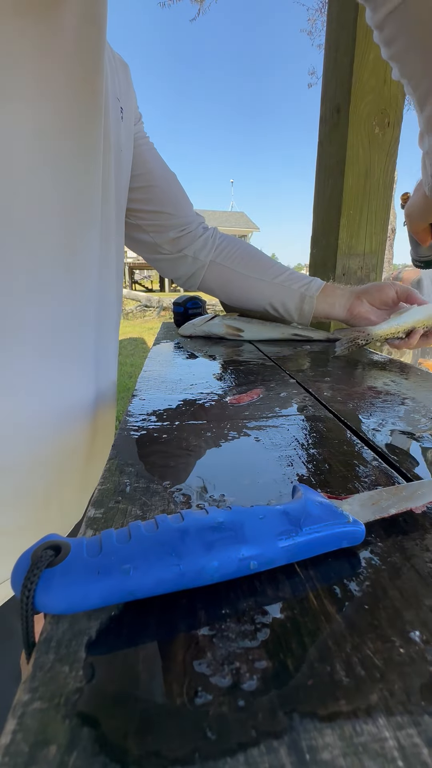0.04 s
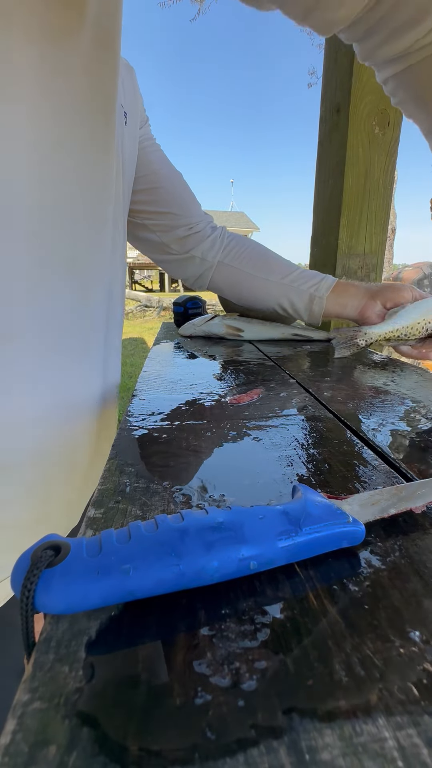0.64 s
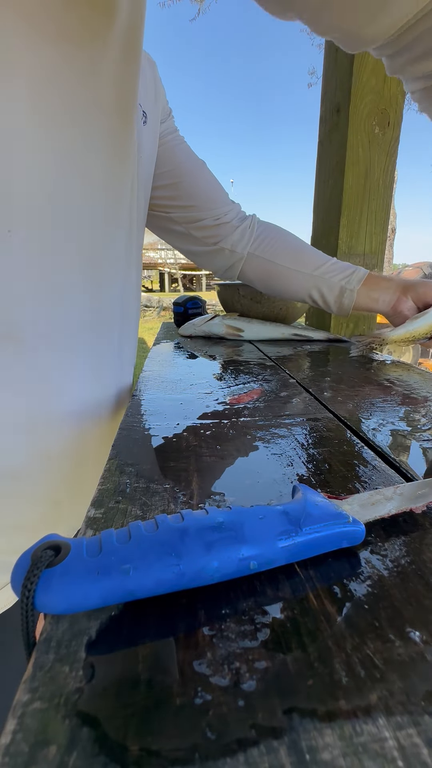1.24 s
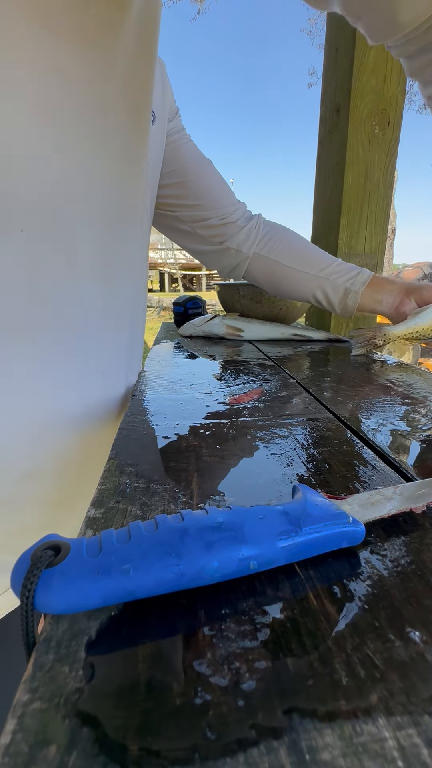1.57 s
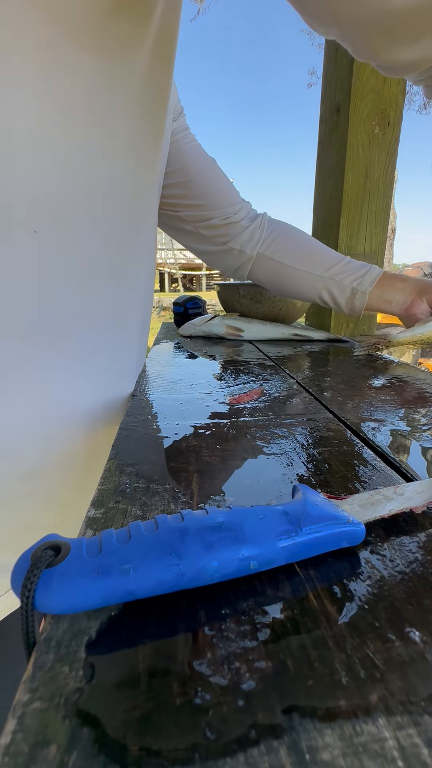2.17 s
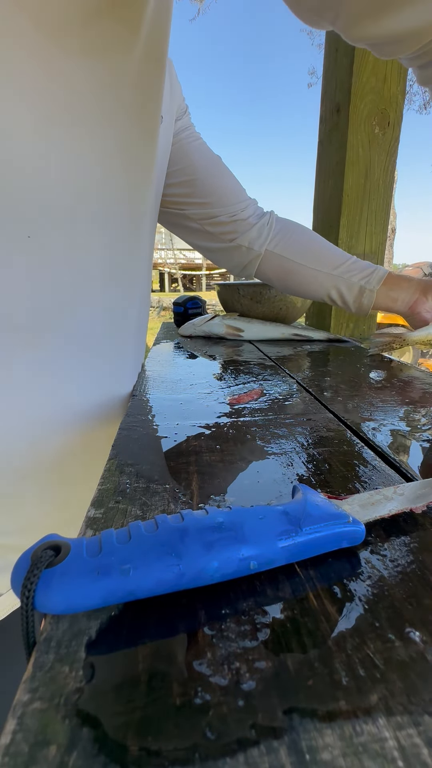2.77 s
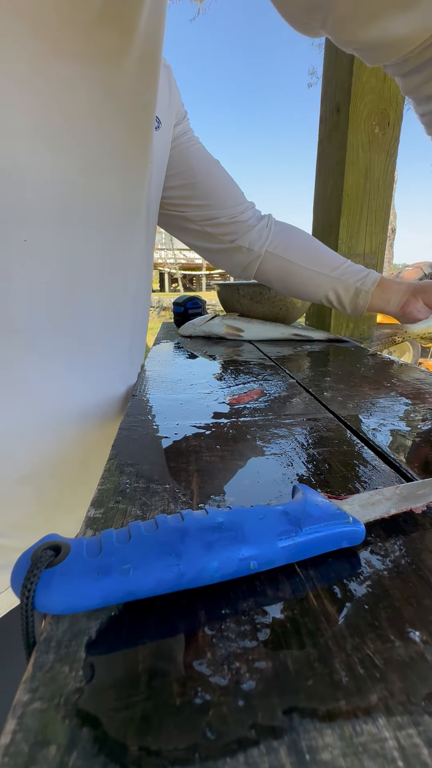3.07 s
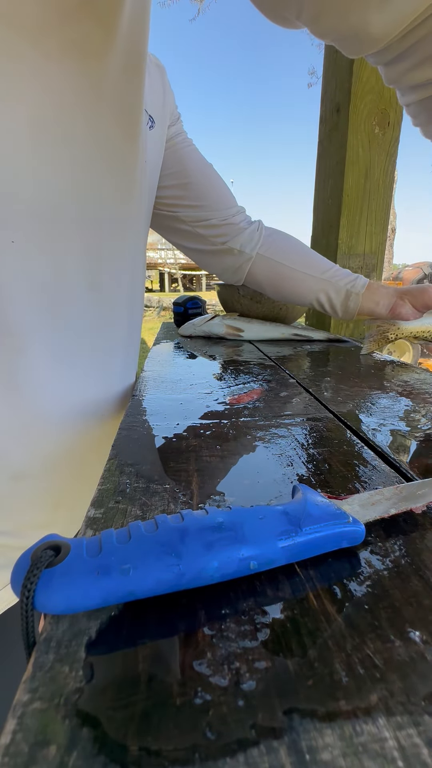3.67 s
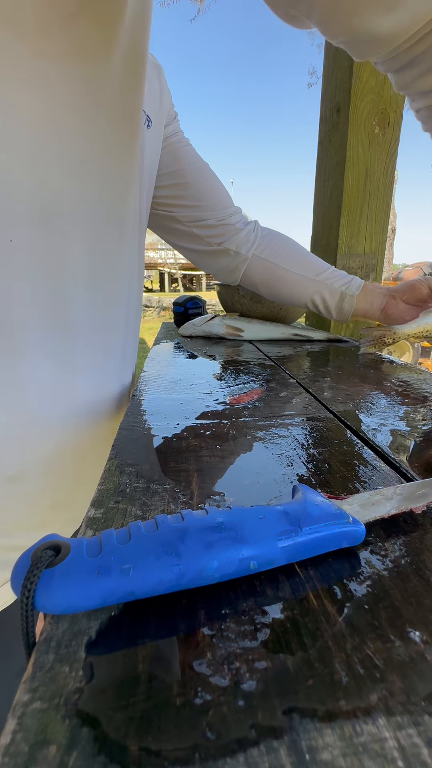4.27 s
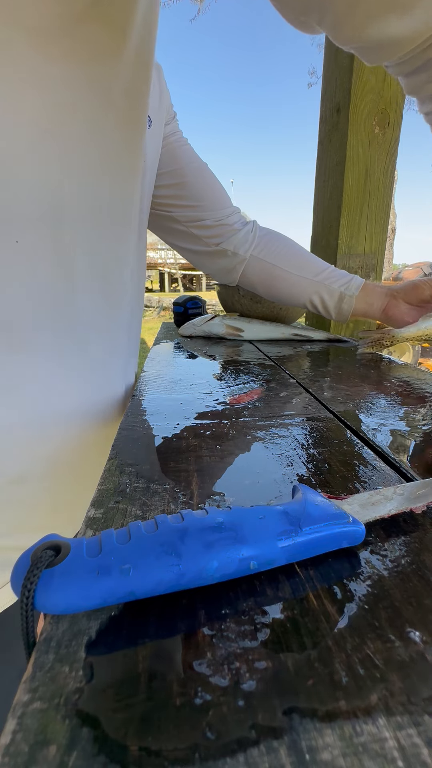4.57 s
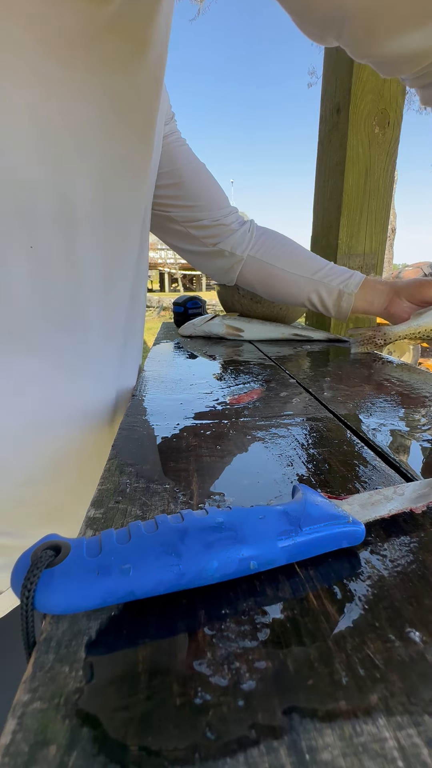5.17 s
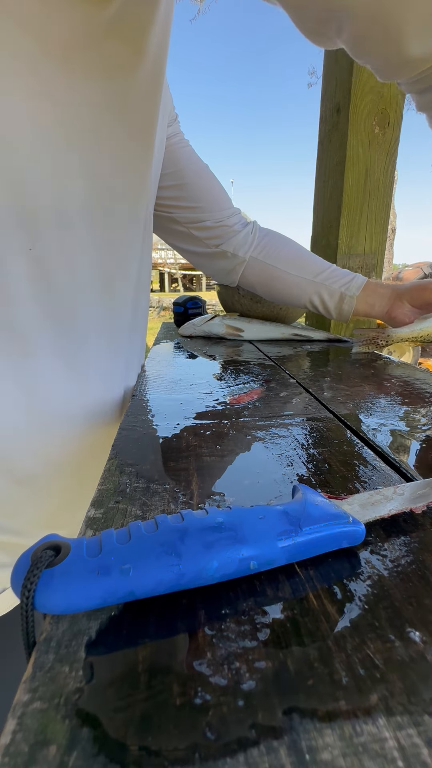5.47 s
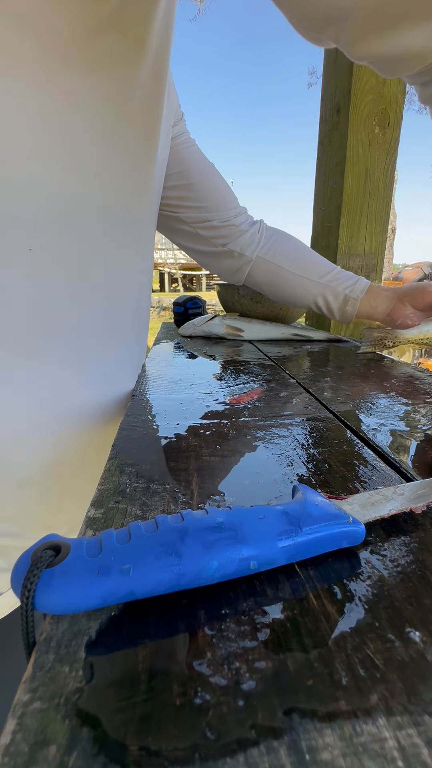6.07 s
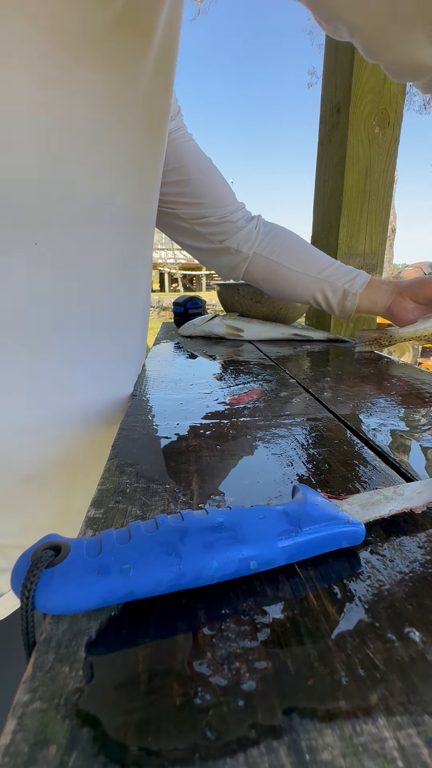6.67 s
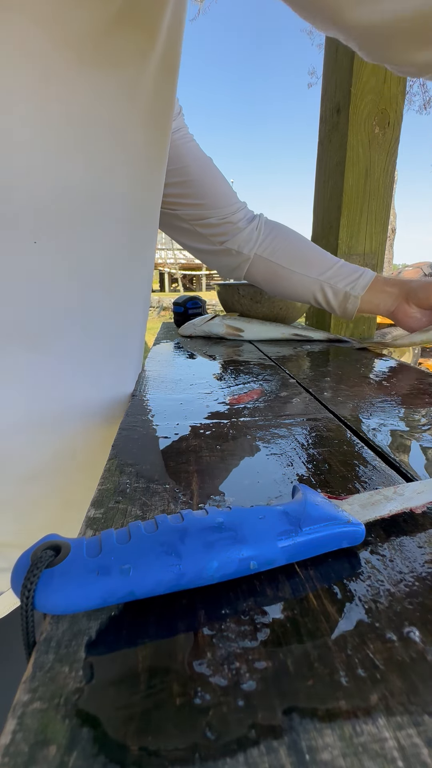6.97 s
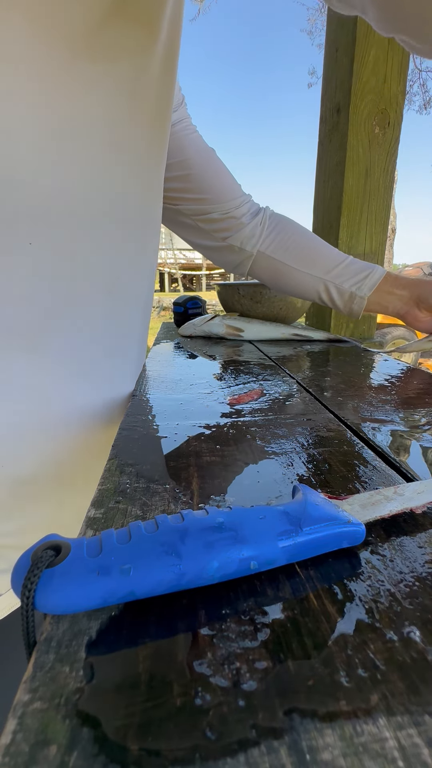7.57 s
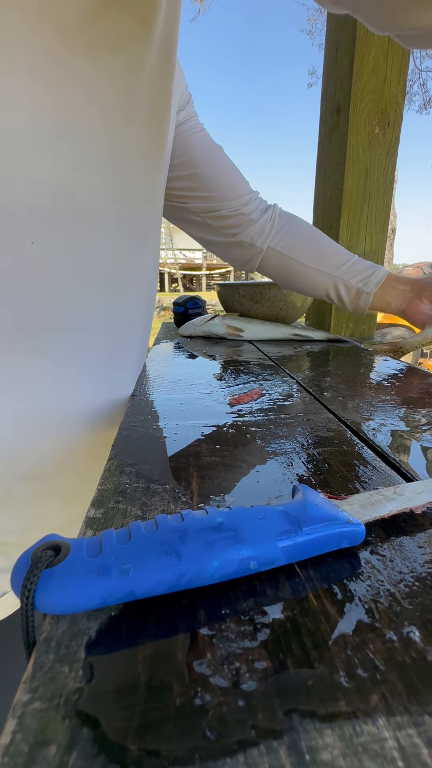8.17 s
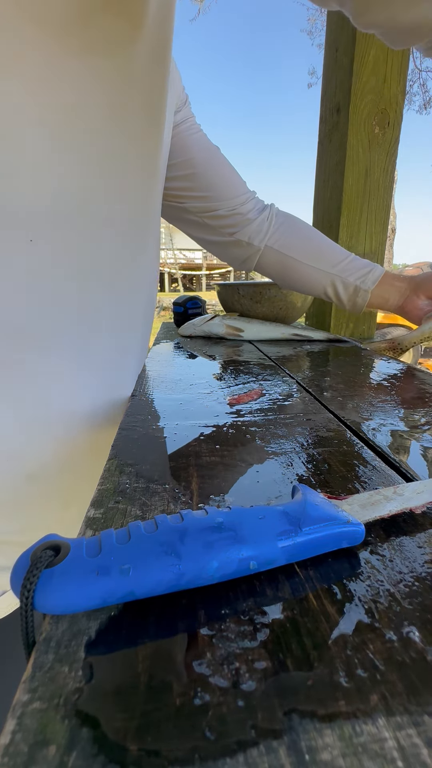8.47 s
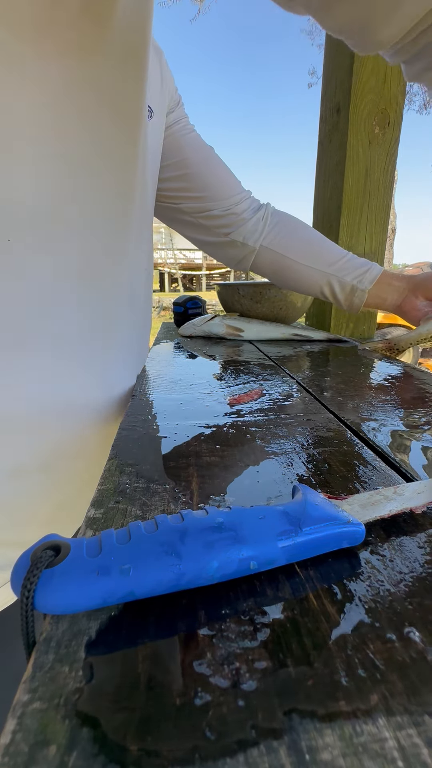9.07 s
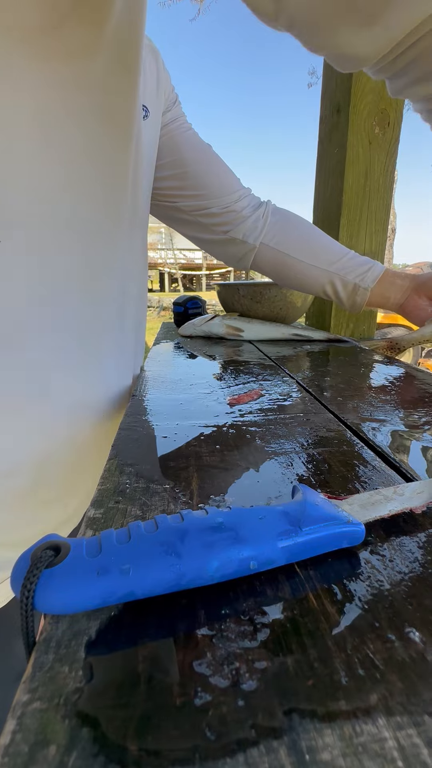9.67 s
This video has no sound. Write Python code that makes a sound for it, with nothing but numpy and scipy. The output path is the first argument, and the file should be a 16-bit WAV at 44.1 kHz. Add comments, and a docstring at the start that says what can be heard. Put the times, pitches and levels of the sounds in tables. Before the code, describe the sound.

Close outdoor water spray hisses and splutters against a fish and wooden boards, over faint wind and a distant motor hum.

```python
"""Hosing a fish on a wooden table

A garden hose sprays a fish held over wet boards, half a metre from a phone's two microphone ports.
Fine droplets hiss, bigger drops spatter, and the heaviest drum on fish and wood as the hand sweeps the jet.
The boards ring in their modes, bubbles resonate, water drips, and table, post and body return short echoes.
Beneath lie soft handling bumps, light wind on the microphone and the hum of a distant motor."""
import sys
import numpy as np
from scipy import signal
from scipy.fft import rfft, irfft, next_fast_len
from scipy.io import wavfile

SR = 44100
rng = np.random.default_rng(int(sys.argv[2]) if len(sys.argv) > 2 else 0)


def materialize(psi):
    """Save the field psi as 16-bit PCM at rate SR to the path in sys.argv[1].

    A 1-D psi becomes a single channel; in a 2-D psi each row is a channel.
    """
    bounded = np.clip(np.atleast_2d(psi).T, -1, 1)
    quanta = np.round(bounded * 32767).astype(np.int16)
    wavfile.write(sys.argv[1], SR, quanta)


N = 433503
TIME = np.arange(N) / SR
SIZE = next_fast_len(N + 2048, True)
BINS = np.maximum(np.arange(SIZE // 2 + 1) * SR / SIZE, 1)  # f/Hz


def spray():
    """Jet break-up: three sizes of drop arrive in clumps, which modulate their common amplitude."""
    hiss_db, spatter_db, drum_db, on_fish = hand()
    impacts = undb(spatter_db) * spatter() * pan(2.2) + undb(drum_db) * drumming(on_fish) * pan(2.3)
    splash = splutter(widen(ringing_boards(impacts)), depth_db=1.7)
    clumps = undb(0.19 * walk(600) + 0.37 * walk(80) + 0.49 * walk(30))
    water = (undb(hiss_db) * hiss() + splash) * clumps
    return water + echoes(water, wander_ms=0.05)


def hand():
    """Source motion: distance and aim set three levels (dB) and the share of the jet on the fish."""
    # the jet carried nearer and further: t/s, relative hiss level/dB, splash re hiss/dB
    jet = [(0.0, -27, -9), (0.34, -27.5, -8), (0.53, -27, -7.5), (1.18, -27, -7), (1.38, -27.5, -6.5),
           (1.86, -27, -7.5), (2.5, -28, -8.5), (2.68, -32, -10.5), (2.77, -32.5, -5.5), (2.84, -31, -4),
           (2.97, -30.5, -4), (3.3, -31.5, -7.5), (3.91, -30.5, -7), (4.54, -30.5, -4.5), (5.2, -28, -5.5),
           (5.64, -31, -3.5), (6.45, -31, -2.5), (6.94, -24, -7), (7.32, -35, -8.5), (8.04, -27.5, -9.5),
           (8.09, -26, -8), (8.56, -29, -8), (8.96, -24.5, -8.5), (9.13, -26.5, -8), (9.3, -25, -7.5),
           (9.83, -27.5, -9.5)]
    # where it lands: t/s, share on the fish (the rest hits the boards)
    aim = [(0, 0.15), (.6, 0.54), (1.2, 0.6), (1.8, 0.5), (2.2, 0.2), (2.6, 0.5), (2.9, 0.94), (3.4, 0.2),
           (4.2, 0.93), (5, 0.87), (5.7, 0.9), (6.6, 0.89), (7.1, 0.08), (8, 0.32), (8.7, 0.3), (9.1, 0.7),
           (9.83, 0.8)]
    # the wrist swings it off its mark and back: t/s, half length/s, hiss loss/dB, splash loss/dB
    swings = [(0.074, 0.059, 5, -0.5), (0.25, 0.044, 5.5, 0.5), (0.444, 0.042, 6.5, 1),
              (0.67, 0.047, 8.5, 5.5), (0.829, 0.021, 5, 3), (0.878, 0.048, 6.5, 3.5), (1.06, 0.031, 8, 7),
              (1.279, 0.024, 6, 7), (1.474, 0.025, 7.5, 6.5), (1.683, 0.067, 3.5, 3.5),
              (2.046, 0.022, 7, 5), (2.205, 0.032, 10.5, 7.5), (2.39, 0.023, 8.5, 4),
              (2.581, 0.036, 14, 11), (3.428, 0.13, 7.5, 4), (3.733, 0.051, 6.5, 1.0), (4.025, 0.054, 2, 1),
              (4.293, 0.039, 1, 1), (4.816, 0.038, 1, 2.5), (5.11, 0.039, 3.5, 3.5), (5.373, 0.043, 1.5, 3),
              (5.487, 0.024, 2.5, 0), (5.903, 0.061, 0.5, 3), (6.152, 0.032, 3, 3.5),
              (6.316, 0.029, 1.5, 3), (6.465, 0.015, -3, 1), (6.617, 0.036, 2, 4.5), (6.817, 0.038, 9, 8.5),
              (6.99, 0.042, 12, 9.5), (7.165, 0.021, 10, 4.5), (7.346, 0.031, 4, 0.5), (7.504, 0.019, 7, 2),
              (7.644, 0.036, 10, 5.5), (7.76, 0.03, 12, 7), (7.91, 0.034, 13, 7), (8.016, 0.034, 11, 7.5),
              (8.325, 0.02, 2, 1.5), (8.437, 0.02, 3.5, 3), (8.566, 0.024, 5.5, 3),
              (8.716, 0.034, 10.5, 11), (8.849, 0.048, 5, 6.5), (9.015, 0.036, 3, 2.5),
              (9.195, 0.026, 2, 4.5), (9.337, 0.027, 6, 8.5), (9.488, 0.014, 4, 6), (9.732, 0.025, 5, -2.5)]
    times, level_db, splash_db = np.transpose(jet)
    jet_db = np.interp(TIME, times, level_db)
    landing_db = jet_db + np.interp(TIME, times, splash_db)
    on_fish = curve(aim)
    hiss_loss, splash_loss = np.zeros((2, N))
    for when, half_length, hiss_lost_db, splash_lost_db in swings:
        away = bell(when, half_length)
        hiss_loss += hiss_lost_db * away
        splash_loss += splash_lost_db * away
    hiss_db = jet_db + 1.27 - hiss_loss
    spatter_db = landing_db - 3.5 - splash_loss
    # heavy drops keep to the core of the jet, so a swing loses more of them
    drum_db = landing_db - 11.5 + 4 * on_fish - 1.68 * splash_loss
    return hiss_db, spatter_db, drum_db, on_fish


def hiss():
    """Shot noise: dense fine droplets merge into a hiss whose lower edge shifts with nozzle angle."""
    # spectrum of fine droplets: f/Hz, relative level/dB
    spectrum = [(5000, -30.5), (8000, -11.5), (9800, -4), (11200, 0.5), (12300, -2.5), (13600, -1),
                (15800, -1.5)]
    # the finest mist, at the very top of the hiss: t/s, gain/dB
    mist = [(0, 2.5), (1.2, -0.5), (1.7, -4), (2.4, 0.5), (2.7, -0.5), (3.6, 0.5), (4.3, -1), (5, -3.5),
            (5.6, 1), (6.2, 2.5), (6.8, -1), (7.3, -2), (8, 1), (8.5, -6), (9, -3), (9.4, -7), (9.83, 1)]
    # angle of the nozzle: t/s, slant (above 0 the hiss is thinner)
    slant = [(0, 0.42), (1.8, -.1), (2.3, .4), (2.9, -0.11), (6.6, -0.071), (7, 1), (8.7, 1), (9.83, .4)]
    from_nozzle = np.array([delay(ms=0.084), delay(ms=0)])
    droplets = shower(rate=18000, spread_db=5, paths=from_nozzle, stray_db=-51)
    fine = unit(through(droplets, colour(spectrum) * ports()))
    edge_shift = resonance(9100, width_hz=380) - resonance(8900, width_hz=380)
    edge = undb(-6) * curve(slant) * through(fine, edge_shift)
    top = through(fine, 1 / (1 + (13000 / BINS) ** 14))
    mist_gain = undb(curve(mist) + 1.5 * walk(26))
    return fine + edge + top * (mist_gain - 1)


def spatter():
    """Impact noise: bigger drops land mostly as strays, nearly incoherent between the ports."""
    # spectrum of bigger drops: f/Hz, relative level/dB
    spectrum = [(1500, -18.5), (2800, -6), (3600, -2), (4400, 0.5), (5800, 6), (6600, 6), (7300, 6.5),
                (8800, 1.5), (11000, -13), (16000, -41)]
    impacts = shower(rate=11000, spread_db=3.5, paths=landing(bounce_db=-14), stray_db=12.5)
    return unit(through(impacts, colour(spectrum) * ports()))


def drumming(on_fish):
    """Impact excitation: fish and boards share the power of the heaviest drops, and the water froths."""
    # response of the fish's open belly: f/Hz, relative level/dB
    belly = [(300, -47), (750, -23), (1300, -18.5), (1750, 9), (2100, -3), (2600, 7), (3050, 7), (3600, 7),
             (4500, 5), (8000, -15.5)]
    # response of the boards, which ring lower: f/Hz, relative level/dB
    boards = [(300, -14), (700, -8.5), (1200, 2.5), (1600, -2), (2200, -8), (3000, -8), (4500, -2.5),
              (8000, -9)]
    heavy = shower(rate=6000, spread_db=4.5, paths=landing(bounce_db=-6.5), stray_db=-1.5)
    fish = unit(through(heavy, colour(belly) * ports()))
    wood = unit(through(heavy, colour(boards) * ports()))
    froth = bubbles(rate=650, low_hz=1400, high_hz=5500, q=22, spread_db=12)
    froth = through(froth, landing(bounce_db=-8))
    return np.sqrt(on_fish) * fish + np.sqrt(1 - on_fish) * wood + undb(-11.5) * froth


def bubbles(rate, low_hz, high_hz, q, spread_db):
    """Bubble resonance: air trapped in the water film rings briefly, rising in pitch as it surfaces."""
    out, t = np.zeros(N + 1024), np.arange(1024) / SR
    for when, pitch, strength in rng.random((int(rate * N / SR), 3)):
        hz = low_hz * (high_hz / low_hz) ** pitch
        age = t * hz / q
        rise = 1 + 0.07 * np.minimum(age, 2)
        envelope = undb(spread_db * strength ** 2) * np.exp(-np.pi * age)
        start = int(when * N)
        out[start:start + len(t)] += envelope * np.sin(2 * np.pi * hz * t * rise)
    return unit(out[:N])


def shower(rate, spread_db, paths, stray_db):
    """Coherence: aimed drops reach both ports by the given paths; strays differ at each port."""
    aimed = unit(through(drops(rate, spread_db), paths))
    strays = np.array([drops(rate, spread_db), drops(rate, spread_db)])
    return aimed + undb(stray_db) * strays


def drops(rate, spread_db):
    """Random impulse train: on average rate impacts a second, of log-normal size."""
    lands = rng.random(N) < rate / SR
    size = undb(spread_db * np.clip(rng.standard_normal(N), -2, 2))
    return unit(lands * size * rng.choice([-1, 1], N))


def landing(bounce_db):
    """Comb filtering: the direct sound and its bounce off the wet boards interfere, sounding hollow."""
    right_phase_rad = 1.3
    direct = np.array([delay(ms=0), delay(ms=0.48) * np.exp(1j * right_phase_rad)])
    return direct * (1 + undb(bounce_db) * delay(ms=0.84))


def ringing_boards(x):
    """Modal resonance: the boards ring under the water and reach both ports alike."""
    # modes of the wet table: f/Hz, bandwidth/Hz, level re the direct sound/dB
    modes = [(1150, 25, -4), (1245, 35, -3), (1795, 30, -2), (2168, 35, 0), (2365, 50, -4), (2564, 70, -7),
             (2723, 55, -3), (3015, 30, 0), (3189, 25, 0), (3832, 30, -2.5), (4152, 35, -0.5),
             (5339, 70, -4)]
    response = sum(undb(db) * resonance(hz, width) for hz, width, db in modes)
    return x + through(x.mean(axis=0), response)


def widen(x):
    """Decorrelation: splash from all round strengthens the difference between the ports."""
    # weighting of the left-right difference: f/Hz, gain/dB
    width = [(700, 4), (1300, 3), (1600, 0), (2100, 8), (2450, 7), (2850, 4.5), (3400, 3), (4200, 0),
             (4800, 4.5), (5500, -1.5), (7300, 0), (8600, 0)]
    side = through((x[0] - x[1]) / 2, colour(width))
    return x.mean(axis=0) + np.array([side, -side])


def splutter(x, depth_db):
    """Amplitude modulation: as the splash changes shape, each half-octave band swells and sinks alone."""
    spectrum, out = rfft(x, SIZE), 0
    half_octaves = np.clip(np.log2(BINS / 1000) * 2, 0, 7)
    for band in range(8):
        share = np.maximum(1 - np.abs(half_octaves - band), 0)
        out = out + irfft(spectrum * share, SIZE)[:, :N] * undb(depth_db * walk(52))
    return out


def echoes(x, wander_ms):
    """Early reflections: their paths lengthen and shorten as the hand moves the jet."""
    # off boards, arm, post and chest: left delay/ms, right delay/ms, level/dB
    reflections = [(1.83, 1.52, -20), (2.36, 3.36, -21), (4.71, 3.81, -20), (5.55, 5.04, -17),
                   (6.23, 5.85, -20), (6.92, 6.9, -20), (12.78, 9.6, -24)]
    dull = through(x, 1 / (1 + (BINS / 8000) ** 4))  # rough wet surfaces scatter the treble away
    out = np.zeros((2, N))
    for left, right, db in reflections:
        shift_ms = wander_ms * walk(5)
        for port, ms in enumerate((left, right)):
            out[port] += undb(db) * np.interp(TIME - (ms + shift_ms) / 1000, TIME, dull[port])
    return out


def ports():
    """Frequency response: each microphone port has its own peaks and dips in the treble."""
    # peaks and dips: f/Hz, half width/Hz, left gain/dB, right gain/dB
    bands = [(4600, 350, 0, -1.5), (5225, 90, -11, -11), (6450, 280, -1.5, 0), (7520, 180, -14, -13),
             (7800, 200, 1.5, 1), (8700, 520, 0, 7), (9250, 500, -3.5, 0), (9480, 110, 0, -4.5)]
    return undb(sum(np.array([[left], [right]]) * np.exp(-((BINS - hz) / width) ** 2)
                    for hz, width, left, right in bands))


def splats():
    """Cavity resonance: the jet catches a hollow of the fish, with a dull slap and a bright spit."""
    # ring of each hollow: t/s, half length/s, f/Hz, level/dB
    hollows = [(.405, 0.013, 2620, -43), (.558, 0.018, 2130, -34.5), (.77, 0.025, 2520, -50),
               (.96, 0.019, 2500, -50), (1.18, 0.038, 2520, -41), (1.385, 0.036, 2500, -56),
               (1.94, 0.036, 1890, -46.5), (2.84, 0.015, 2160, -41.5), (2.925, 0.044, 2560, -42),
               (3.04, 0.04, 2800, -41), (3.165, 0.022, 1690, -44), (4.45, 0.034, 3500, -42),
               (4.68, 0.034, 2420, -44), (4.72, 0.031, 3900, -43), (5.28, 0.041, 3320, -44),
               (5.64, .04, 2720, -45), (6.04, .03, 4300, -42), (6.39, .022, 3650, -47),
               (6.53, 0.027, 3900, -37), (6.9, 0.018, 2600, -47), (7.835, 0.013, 2210, -48),
               (8.27, 0.022, 2400, -52), (9.12, 0.028, 2410, -43), (9.42, 0.02, 2600, -44),
               (9.575, 0.025, 3300, -38), (9.71, 0.024, 2370, -43), (9.8, 0.02, 2530, -36)]
    ring = swells(hollows, width_share=0.36, side_db=1.5)
    slap = undb(-7.5) * swells(hollows, width_share=0.79, side_db=5, pitch_ratio=0.56)
    spit = undb(-2.5) * swells(hollows, width_share=1.0, side_db=0, pitch_ratio=1.88)
    return ring + slap + spit


def runoff():
    """Impact noise: water drips steadily off the fish and the table."""
    # spectrum of the drips: f/Hz, relative level/dB
    spectrum = [(500, -22), (1500, 5), (2700, -15), (5000, 4.5), (8000, -19), (14000, -17)]
    drips = shower(rate=3800, spread_db=5, paths=landing(bounce_db=-15), stray_db=-16)
    return undb(-60) * unit(through(drips, colour(spectrum)))


def handling():
    """Heavy damping: soft bumps of handling give brief, low bands of noise."""
    # bumps: t/s, half length/s, f/Hz, level/dB
    bumps = [(.34, .06, 170, -50), (1.25, .02, 210, -53), (1.71, .018, 280, -53), (2.68, .015, 430, -53),
             (2.9, .022, 400, -54), (3.19, .025, 200, -53), (4.46, .012, 220, -52), (6.25, .012, 240, -48),
             (7.11, .012, 290, -50), (8.26, .012, 220, -52)]
    return swells(bumps, width_share=0.7, side_db=-10)


def wind():
    """Turbulence: gusts on the microphone make short, deep rumbles."""
    # gusts: t/s, half length/s, f/Hz, level before panning/dB
    gusts = [(1.25, 0.025, 55, -46.5), (1.38, 0.031, 75, -47), (2.48, .05, 58, -47),
             (3.04, 0.056, 62.3, -38.5), (5.52, 0.016, 62, -50), (6.95, 0.038, 68, -42),
             (7.84, .029, 62, -50), (8.18, .06, 60.4, -48), (8.72, 0.048, 56, -34.5),
             (9.67, 0.048, 62, -39.5)]
    return swells(gusts, width_share=0.68, side_db=8) * pan(4.4)


def motor():
    """Line spectrum: the partials of a distant motor waver together in pitch, and some beat slowly."""
    # partials: f/Hz, level/dB, beat depth (0-1)
    partials = [(58, -60, 0.46), (119, -65.5, 0), (174.2, -67.5, 0.23), (234.5, -67.5, 0), (749, -72, 0)]
    period_s, crest_s = 2.91, 0.24
    beat = np.cos(2 * np.pi * (TIME - crest_s) / period_s)
    drift_s = np.cumsum(0.00695 * walk(9)) / SR
    hum = np.zeros(N)
    for hz, db, depth in partials:
        amplitude = np.sqrt(2) * undb(db + 1.1 * walk(9.9)) * (1 + depth * beat)
        hum += amplitude * np.sin(2 * np.pi * hz * (TIME + drift_s))
    return hum


def open_air():
    """Diffuse field: long waves arrive much alike at both ports, while a breeze rumbles at each alone."""
    # outdoor noise: f/Hz, relative level/dB
    spectrum = [(20, -21), (40, -6), (75, 1.5), (140, -6.5), (190, 1), (245, -4.5), (300, -5.5), (450, -7),
                (650, -10), (1200, -10.5), (2500, -17.5), (8000, -64)]
    apart = np.clip(0.44 + BINS / 1100, 0, 2)
    common = through(rng.standard_normal(N), colour(spectrum))
    separate = through(rng.standard_normal((2, N)), colour(spectrum) * apart)
    air = unit(common + separate) * undb(-51.5 + 0.91 * walk(7.6))
    breeze = unit(through(rng.standard_normal((2, N)), resonance(50, width_hz=67) ** 2))
    return air + breeze * undb(-64.5 + 2.2 * walk(11))


def swells(rows, width_share, side_db, pitch_ratio=1):
    """Band-limited noise in bell-shaped bursts; side_db is the part in antiphase at the two ports."""
    out = np.zeros((2, N))
    for when, half_length, hz, db in rows:
        envelope = bell(when, half_length)
        near = envelope > 0
        mid, side = rng.standard_normal((2, SR))[:, :near.sum()]
        noise = mid + undb(side_db) * np.array([side, -side])
        b, a = signal.iirpeak(hz * pitch_ratio, 1 / width_share, fs=SR)
        ring = signal.lfilter(b, a, signal.lfilter(b, a, noise))
        out[:, near] += unit(ring) * undb(db) * envelope[near]
    return out


def bell(when, half_length):
    """Gaussian envelope with a peak of 1; both arguments in seconds."""
    out = np.zeros(N)
    near = np.abs(TIME - when) < 4 * half_length
    out[near] = np.exp(-((TIME[near] - when) / half_length) ** 2 / 2)
    return out


def curve(points):
    """Linear interpolation of (t/s, value) points."""
    return np.interp(TIME, *np.transpose(points))


def walk(rate):
    """Random fluctuation of rms 1, changing rate times a second."""
    return unit(np.interp(TIME * rate, np.arange(N // 8), rng.standard_normal(N // 8)))


def through(x, response):
    """Linear filtering: the spectrum is multiplied by a frequency response."""
    return irfft(rfft(x, SIZE) * response, SIZE)[..., :N]


def colour(points):
    """Magnitude response joining (f/Hz, level/dB) points on a log-frequency axis."""
    hz, db = np.transpose(points)
    return undb(np.interp(np.log(BINS), np.log(hz), db))


def resonance(hz, width_hz):
    """Response of a damped oscillator, gain 1 at its centre."""
    return 1 / (1 + 1j * (BINS ** 2 - hz ** 2) / (BINS * width_hz))


def delay(ms):
    """Pure delay: phase lag grows in proportion to frequency."""
    return np.exp(-2j * np.pi * BINS * ms / 1000)


def pan(left_db):
    """Left and right gains for a level difference."""
    return undb(np.array([[left_db], [-left_db]]) / 2)


def undb(db):
    """Decibels to amplitude ratio."""
    return 10 ** (np.asarray(db) / 20)


def unit(x):
    """Normalisation to rms 1."""
    return x / np.sqrt(np.mean(x ** 2))


def scene():
    """Superposition: water, handling and wind add over the motor and the open air."""
    return spray() + splats() + runoff() + handling() + wind() + (motor() + open_air()) * pan(2)


def record(dry):
    """Band limiting: the phone cuts the deepest rumble and, steeply, the top."""
    low_hz, top_hz = 34, 15800
    lean = signal.sosfilt(signal.butter(4, low_hz, "highpass", fs=SR, output="sos"), dry)
    return signal.sosfilt(signal.ellip(12, .1, 80, top_hz, fs=SR, output="sos"), lean)


dry = scene()
out = record(dry)
materialize(out)
```